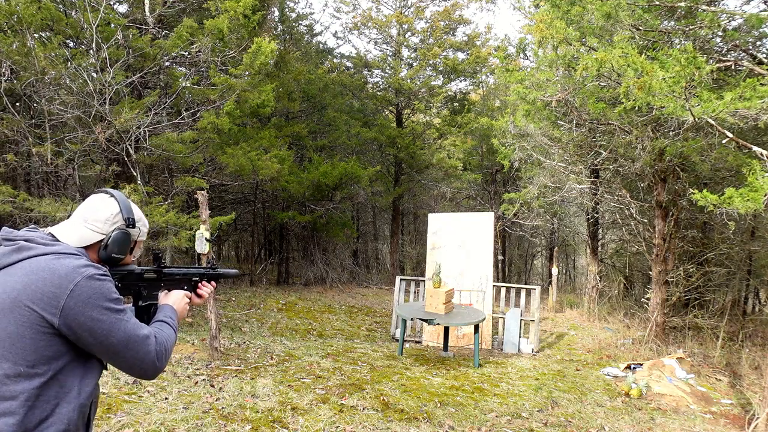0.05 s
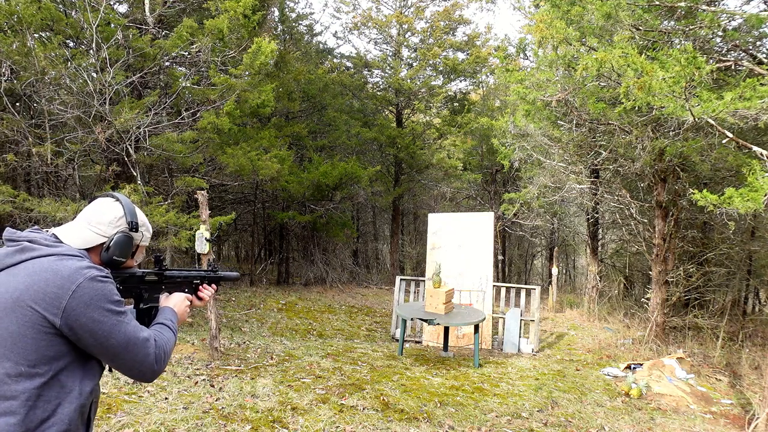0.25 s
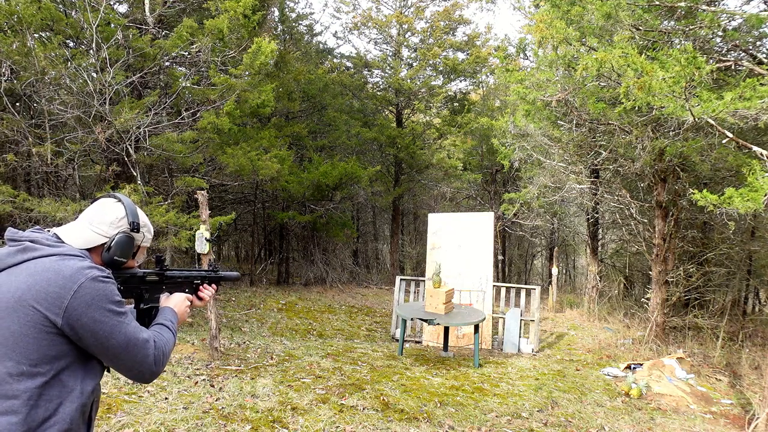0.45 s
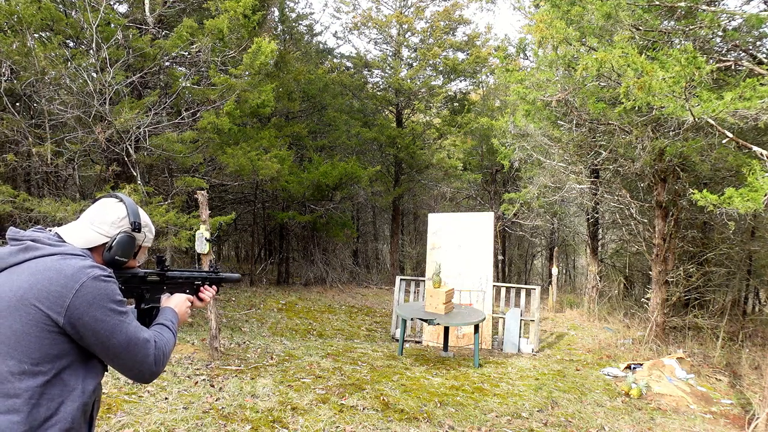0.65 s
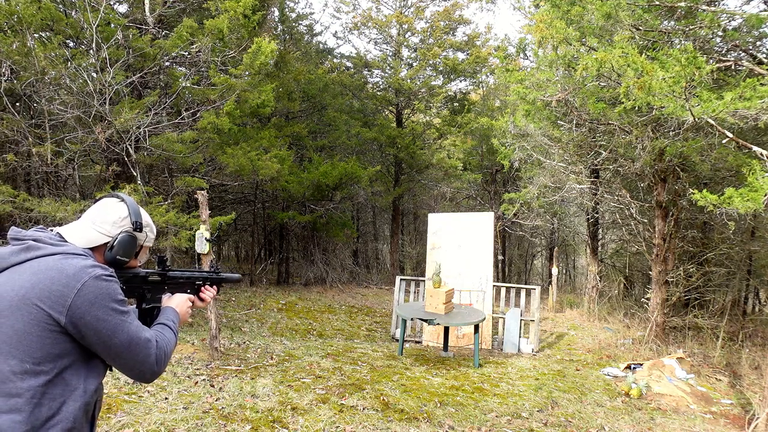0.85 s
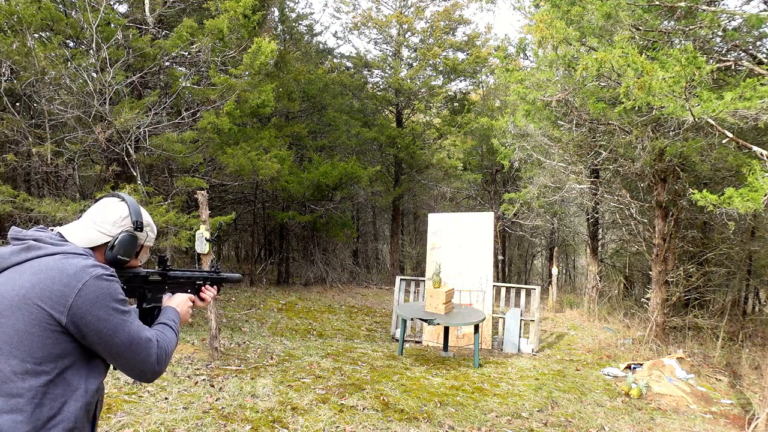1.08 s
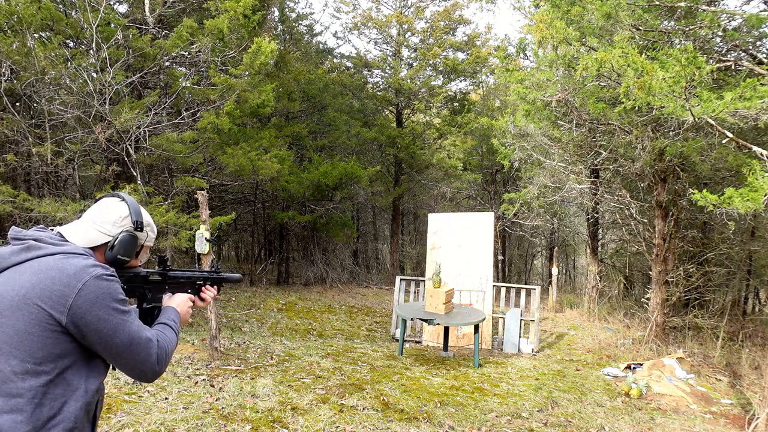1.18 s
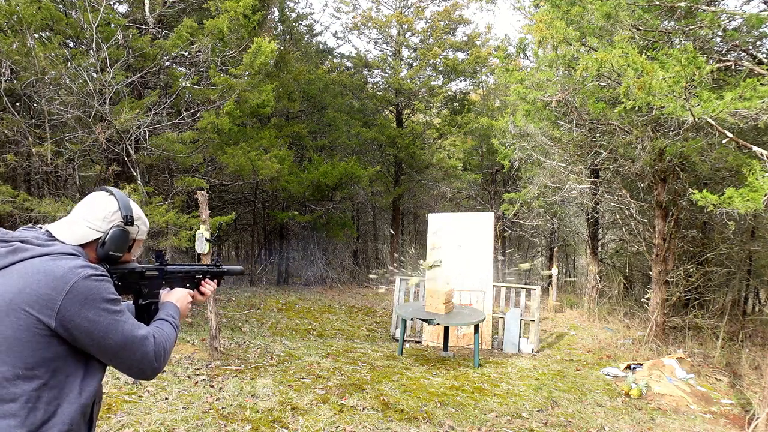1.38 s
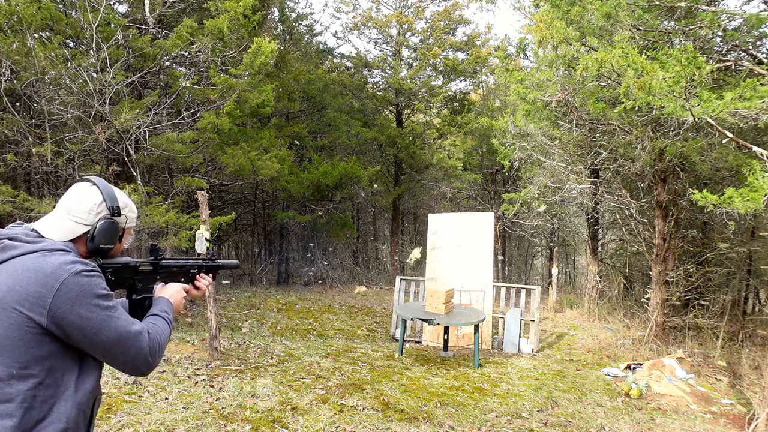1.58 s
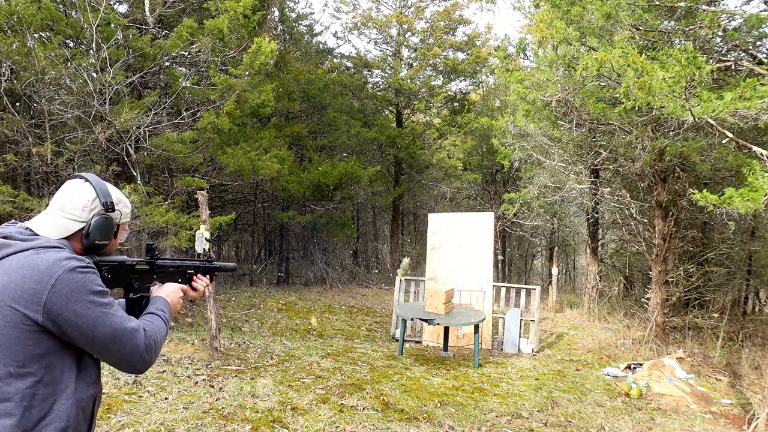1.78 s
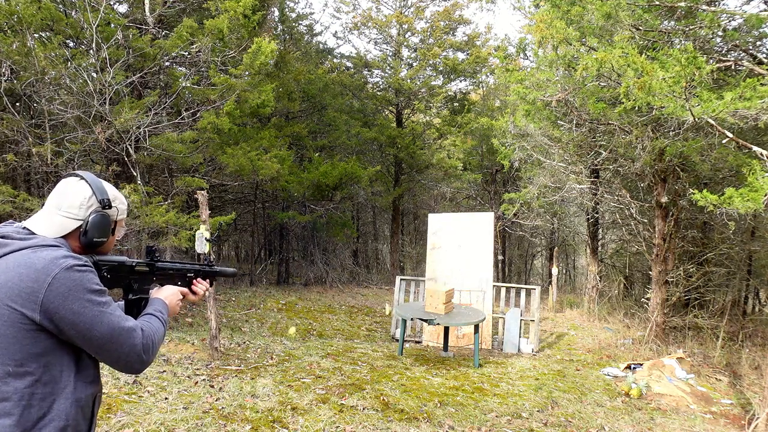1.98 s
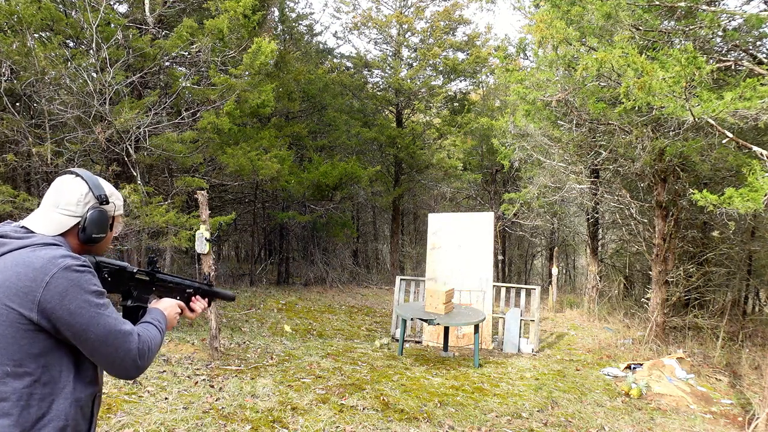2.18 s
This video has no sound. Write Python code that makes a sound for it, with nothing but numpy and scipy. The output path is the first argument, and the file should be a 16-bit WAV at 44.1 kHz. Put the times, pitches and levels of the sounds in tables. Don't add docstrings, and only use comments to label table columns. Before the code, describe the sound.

A single loud gunshot cracks close by in the woods, its echo darkening and fading away

```python
import sys
import numpy as np
from scipy import signal
from scipy.fft import rfft, irfft, next_fast_len
from scipy.io import wavfile
from scipy.ndimage import uniform_filter1d, map_coordinates

SR = 44100
rng = np.random.default_rng(int(sys.argv[2]) if len(sys.argv) > 2 else 0)


def decibels_to_gain(level_db):
    exponent = np.asarray(level_db, float) / 20
    return 10 ** exponent


def materialize(psi):
    bounded = np.clip(np.atleast_2d(psi).T, -1, 1)
    quanta = np.round(bounded * 32767).astype(np.int16)
    wavfile.write(sys.argv[1], SR, quanta)


N = 98387
SHOT_S = 1.3408
FREE_S = 1.392


def unit(x):
    return x / np.sqrt(np.mean(x ** 2) + 1e-20)


def along(points, hz):
    f, v = np.transpose(points)
    return np.interp(np.log(hz + 1), np.log(f + 1), v)


def wobble(rate):
    knots = rng.standard_normal(int(N * rate / SR) + 4)
    return map_coordinates(knots, [np.arange(N) * rate / SR])


def filtered(x, response):
    m = next_fast_len(N + SR // 2)
    return irfft(rfft(x, m) * response(np.fft.rfftfreq(m, 1 / SR)), m)[..., :N]


def ringing(peaks):
    def body(f):
        total = 0
        for k, (centre, width, db) in enumerate(peaks):
            resonance = 1j * f * width / (centre * centre - f * f + 1j * f * width)
            total = total + (-1) ** k * decibels_to_gain(db) * resonance
        return total
    return unit(filtered(rng.standard_normal(N), body))


def dying(s, db, t60):
    t = np.arange(N) / SR - s
    return (t >= 0) * decibels_to_gain(db - 60 * np.abs(t) / t60)


def blast():
    # (centre [Hz], width [Hz], level [dB])
    crack_peaks = [(1300, 1000, 2), (3600, 1100, 5), (12500, 5000, -15)]
    # (centre [Hz], width [Hz], level [dB])
    snap_peaks = [(13000, 5000, 0)]
    # (time [s], length [s])
    near_walls = [
        (1.3920, .0014),
        (1.3947, .0018),
    ]
    crack_s, push_s, swing_s = .005, .0023, .0004
    stuck = 4
    suction, recover_s = .62, .04
    t = np.arange(N) / SR
    since = t - SHOT_S
    rise = np.clip(since / .0018, 0, 1) ** 2
    crack = decibels_to_gain(11) * ringing(crack_peaks) * rise * (since < crack_s)
    snap = ringing(snap_peaks) * dying(SHOT_S + .0004, -3, .012)
    turn = 2 * (since - crack_s - push_s) / swing_s - 1
    swing = np.clip(turn / stuck / 2, -1, 1) * (since >= crack_s)
    relaxing = suction * np.exp(-np.abs(t - FREE_S) / recover_s)
    pressure = swing * np.where(t < FREE_S, stuck, relaxing)
    walls = sum(-2.6 * (t >= s) * np.clip(1 - (t - s) / length, 0, 1) for s, length in near_walls)
    return crack + snap + pressure + walls


def echo():
    # (time [s], level [dB])
    strength = [
        (1.4, -11.5),
        (1.41, -17),
        (1.542, -13.5),
        (1.652, -24),
        (1.92, -35),
        (1.926, -32.5),
        (2.122, -36),
        (2.128, -34),
        (2.23, -35.5),
    ]
    # (frequency [Hz], level [dB per Hz])
    trees = [(60, -23), (270, -16), (410, 2), (700, 0.5), (1000, -6.5), (3600, -12), (5500, -26),
             (16000, -59.5)]
    # (frequency [Hz], added level [dB])
    air = [(100, 8), (250, -15), (600, 4.5), (1500, -3), (3500, -15), (5500, -31.5), (10000, -25.5)]
    darken_s = 0.5
    overdrive_db, overdrive_s = 7.5, 0.046
    hz, t, z = signal.stft(rng.standard_normal(N), SR, nperseg=256)
    near = -7 * np.exp(-np.clip(t - FREE_S, 0, None) / .03) * (hz[:, None] < 1000)
    far = 1 - np.exp(-np.clip(t - FREE_S - .1, 0, None) / darken_s)
    patches = uniform_filter1d(rng.standard_normal(z.shape), 2, 0)
    patches = unit(uniform_filter1d(patches, 3, 1))
    colour_db = along(trees, hz)[:, None] + along(air, hz)[:, None] * far
    gain = decibels_to_gain(colour_db + near + 0.6 * patches)
    gain = gain / np.sqrt(np.mean(gain ** 2, 0))
    noise = unit(signal.istft(z * gain, SR, nperseg=256)[1][:N])
    time = np.arange(N) / SR
    lumps_db = 1.3 * wobble(180)
    level_db = np.interp(time, *np.transpose(strength)) + lumps_db + 0.42
    level_db = level_db + overdrive_db * np.exp(-np.abs(time - FREE_S) / overdrive_s)
    fade_in = np.clip((time - FREE_S - .003) / 0.006, 0, 1)
    return noise * decibels_to_gain(level_db) * fade_in


def boom():
    # (time [s], peak level [dB], frequency [Hz])
    pushes = [(1.414, -21.5, 59.5), (1.492, -14.5, 132), (1.552, -20.5, 112), (1.574, -21, 111),
              (1.626, -24, 125), (1.705, -37.5, 120), (1.78, -37, 100), (1.818, -31, 125),
              (1.856, -36, 120), (1.885, -33.5, 130), (1.911, -29.5, 125), (1.96, -38.5, 85.3),
              (2.02, -44.5, 80), (2.103, -40, 106.6), (2.169, -44, 90), (2.202, -46.5, 101)]
    # (centre [Hz], width [Hz], level [dB])
    roll_peaks = [(125, 78, 0), (70, 31, -12)]
    half_cycles = 1.1
    t = np.arange(N) / SR

    def push(s, db, hz):
        swell = np.exp(-((t - s) * hz / half_cycles) ** 2)
        return decibels_to_gain(db) * swell * np.cos(2 * np.pi * (hz * (t - s) + rng.random()))

    roll = ringing(roll_peaks) * dying(FREE_S, -25.5, 1.25)
    return sum(push(*row) for row in pushes) + roll


def slaps():
    # (time [s], level [dB], time to fall 60 dB [s])
    returns = [
        (1.431, -10, 0.22),
        (1.518, -11, 0.17),
        (1.765, -30.5, 0.26),
        (1.882, -35.5, .1),
        (1.928, -32, 0.37),
        (2.04, -31.5, 0.29),
        (2.122, -28, 0.7),
    ]
    # (centre [Hz], width [Hz], level [dB])
    slope_peaks = [(425, 157, 1), (650, 269, -4.5)]
    t = np.arange(N) / SR
    swell = sum(dying(s, db, t60) * np.clip((t - s) / .008, 0, 1) for s, db, t60 in returns)
    return swell * ringing(slope_peaks) * decibels_to_gain(1.7 * wobble(120))


def action():
    # (time [s], peak level [dB], time to fall 60 dB [s], centre [Hz], body [Hz], body level [dB])
    parts = [
        (0.248, -52, 0.023, 3200, 603, 7),
        (0.247, -50, 0.031, 590, 445, 2.5),
        (.858, -64, .012, 4000, 2500, -6),
        (.977, -58, .015, 3500, 2400, -1),
        (1.045, -64, .012, 4200, 3000, -6),
        (1.133, -62, .015, 4000, 2500, -6),
        (1.2989, -31.5, 0.0115, 3300, 1800, -3.5),
        (1.3022, -37.5, .02, 2945, 1500, 0.5),
        (1.306, -47.5, .07, 2200, 750, 6),
        (1.328, -43, .03, 2500, 1198, -1.5),
    ]
    # (time [s], peak level [dB], time to fall 60 dB [s])
    hits = [
        (1.3312, -34.5, 0.017),
        (1.334, -25, .015),
        (1.3324, -22.5, 0.02),
    ]
    # (centre [Hz], width [Hz], level [dB])
    hammer_peaks = [(1500, 400, 1.5), (3300, 1500, -1.5), (8760, 5000, -17.5)]
    dull_hz = 4800
    ticks = 0
    for s, db, t60, hz, body_hz, body_db in parts:
        metal = ringing([(hz, 1.4 * hz, 0), (body_hz, .7 * body_hz, body_db)])
        ticks = ticks + dying(s, db - 6.5, t60) * metal
    hammer = sum(dying(*row) for row in hits) * ringing(hammer_peaks)

    def dull(hz):
        return 1 / (1 + 1j * hz / dull_hz * 1.2 - (hz / dull_hz) ** 2) ** 2

    return filtered(ticks, dull) + hammer


def debris():
    # (time [s], level [dB], a quarter of the rustle's time to fall 60 dB [s])
    landings = [(1.404, -12, 0.017), (1.414, -10, 0.023), (1.417, -3, 0.04), (1.422, -8.5, 0.027),
                (1.5535, -11, 0.015), (1.58, -36, 0.0076), (1.678, -40, 0.017), (1.702, -45, .01),
                (1.788, -33, 0.045), (1.829, -44.5, 0.031), (1.929, -49.5, .03), (1.940, -43, .03),
                (1.953, -39.5, 0.083), (1.977, -35.5, 0.0334), (2.082, -46, .04), (2.13, -48.5, 0.013),
                (2.168, -52, .03), (2.177, -45.5, 0.049), (2.186, -43, 0.041), (2.196, -42.5, 0.027),
                (2.209, -44, 0.059)]
    # (centre [Hz], width [Hz], level [dB])
    litter_peaks = [(6640, 9000, -3), (12800, 7900, -8.5)]
    tick_t60_s, spread_s = .012, .78
    patter_db, patter_t60_s = -54.5, 2.4
    ticks = 0
    for s, db, t60 in landings:
        rustle = dying(s, db - 27, 4 * t60)
        ticks = ticks + dying(s, db - 12.5, tick_t60_s) + rustle
    crumbs = 0
    for when, weakness in rng.random((50, 2)):
        crumb_db = patter_db - 60 * when / patter_t60_s - 12 * weakness
        crumbs = crumbs + dying(1.6 + spread_s * when, crumb_db, tick_t60_s)
    return (ticks + crumbs) * ringing(litter_peaks)


def floor():
    # (multiple of the base pitch, level [dB])
    orders = [(1.5, -67), (2, -70), (3, -65.5), (4, -58.5), (5, -71.5), (6, -73), (7, -69), (8, -80),
              (9, -77.5), (10, -70.5), (13, -78), (17, -85.5), (20, -83.5), (21, -82), (25, -90), (32, -89)]
    # (frequency [Hz], level [dB per Hz])
    rumble = [(20, -10.5), (40, 6.5), (120, -8), (300, -17), (600, -22.5), (2000, -36.5), (5000, -43),
              (16000, -55.5)]
    engine_hz = 25.06
    t = np.arange(N) / SR

    def tone(multiple, db):
        level = decibels_to_gain(db + 3 + wobble(5))
        cycles = multiple * engine_hz * t + rng.random() + .04 * wobble(4)
        return level * np.sin(2 * np.pi * cycles)

    hum = sum(tone(*row) for row in orders)
    noise = unit(filtered(rng.standard_normal(N), lambda hz: decibels_to_gain(along(rumble, hz))))
    return hum + decibels_to_gain(-61) * noise


def scene():
    mono = blast() + echo() + boom() + slaps() + action() + debris() + floor()
    return np.array([mono, mono])


def top_cut(x):
    return signal.sosfilt(signal.butter(12, 16340, fs=SR, output="sos"), x)


def record(dry):
    # (time [s], clipping level)
    rail = [
        (1.341, 1.0),
        (1.3455, .75),
        (1.349, .57),
        (1.392, .46),
        (1.397, .66),
        (1.42, .6),
        (1.44, .6),
        (1.5, .98),
    ]
    # (time [s], step, decay [s])
    mismatch = [
        (1.3645, .045, .005),
        (1.3755, -.085, .006),
        (1.390, .05, .008),
    ]
    sag_s, fall_s, back_s = 1.3645, .0032, .008
    depth, stays = .52, .12
    t = np.arange(N) / SR
    sag = np.interp(t - sag_s, [0, fall_s, fall_s + back_s], [0, 1, stays]) * (t < FREE_S)
    top = np.interp(t, *np.transpose(rail)) - depth * uniform_filter1d(sag, size=130)
    hiss = decibels_to_gain(-45) * rng.standard_normal(N) * (t > SHOT_S) * (t < sag_s + .011)
    clipped = dry / (1 + np.abs(dry / top) ** 16) ** (1 / 16) + hiss

    def circuit(hz):
        capacitors = (1j * hz / (17 + 1j * hz)) * (1j * hz / (13 + 1j * hz))
        return capacitors / (1 + (hz / 16050) ** 60)

    out = filtered(clipped, circuit)
    side = sum(step * dying(s, 0, np.log(1000) * decay) for s, step, decay in mismatch)
    mix = np.clip(out + np.array([side, -side]), -1, 1)
    return top_cut(mix)


dry = scene()
out = record(dry)
materialize(out)
```